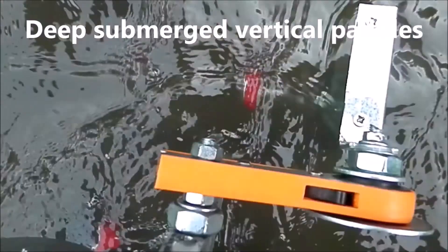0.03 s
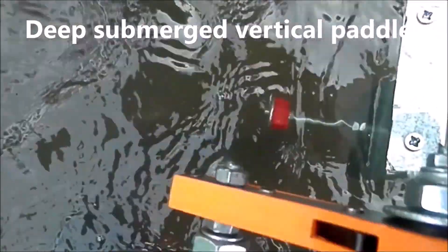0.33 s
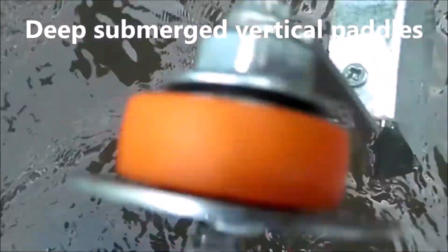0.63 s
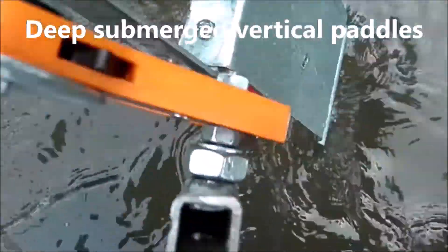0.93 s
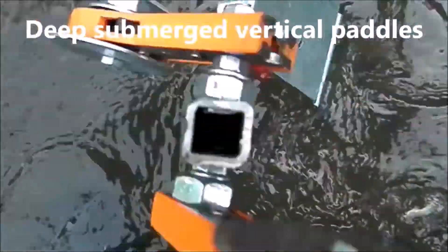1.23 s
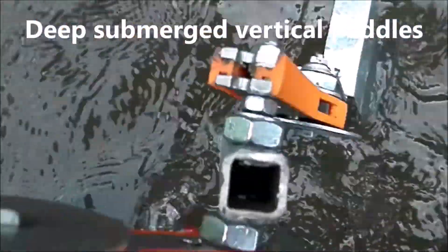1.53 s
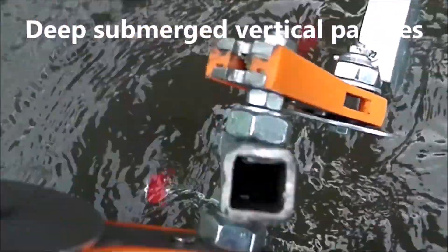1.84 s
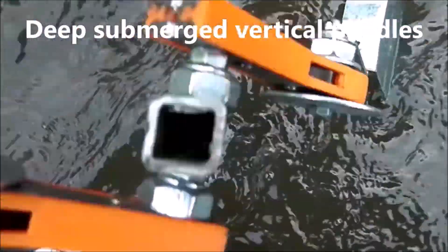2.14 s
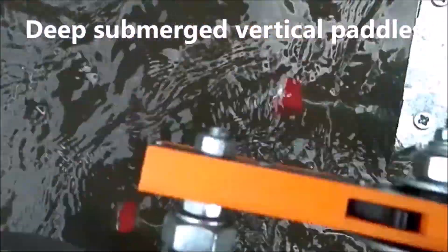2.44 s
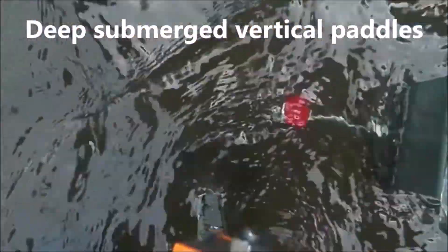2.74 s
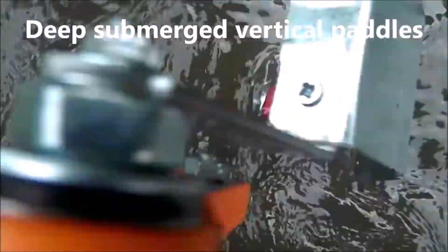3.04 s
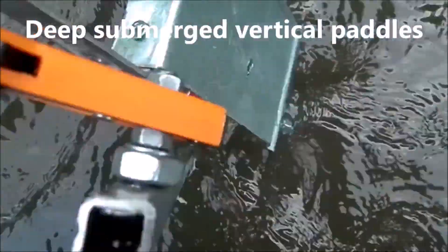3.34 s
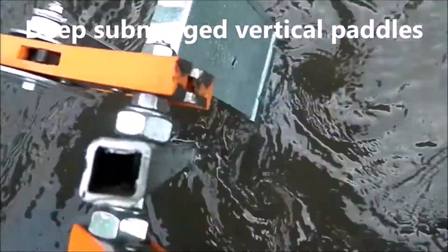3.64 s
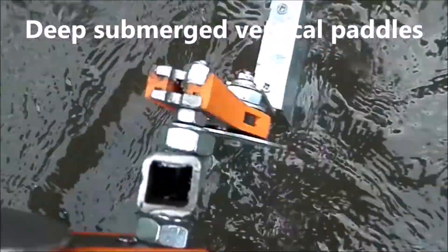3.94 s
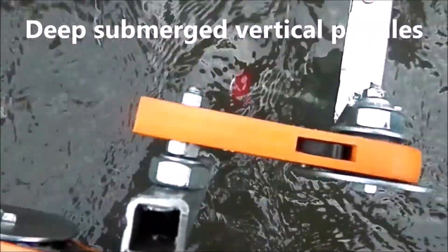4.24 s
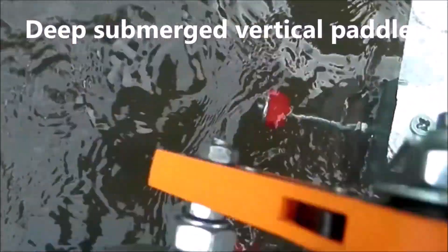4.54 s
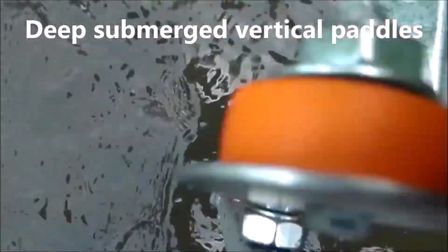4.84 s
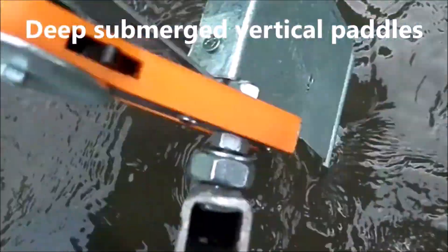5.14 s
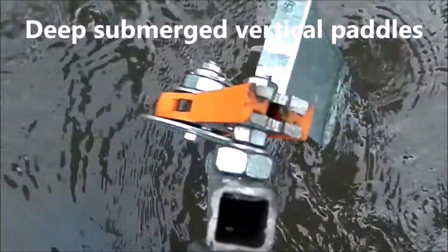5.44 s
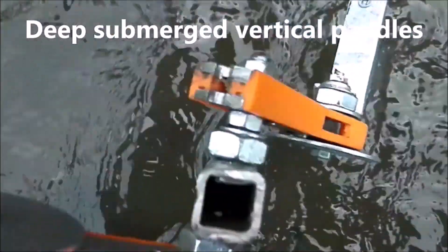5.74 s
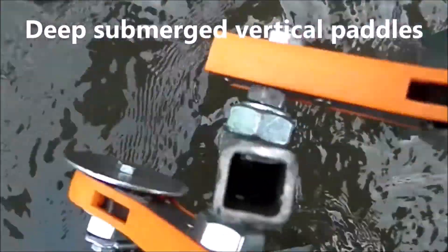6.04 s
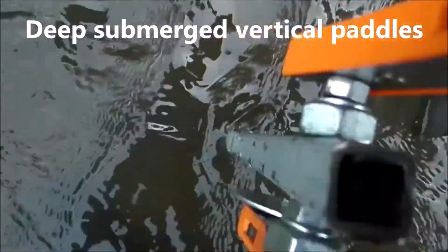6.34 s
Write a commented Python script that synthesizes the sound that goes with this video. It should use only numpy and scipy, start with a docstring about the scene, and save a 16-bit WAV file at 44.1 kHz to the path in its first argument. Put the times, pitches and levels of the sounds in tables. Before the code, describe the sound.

A steel paddle wheel turns close to the microphone on a river. Its loose joints clink, click and knock in a quick, uneven stream, briefly ringing the frame and blades, strongest in the first second. Underneath, the water rumbles faintly, trickles and plops. A deep eddy swells softly about two seconds in, and the loudest plops come near four seconds while the rattling carries on.

```python
"""A steel paddle wheel turns close by in a river that rumbles, trickles and plops throughout.
From the start its loose linkage knocks and clicks, ringing frame and blades; at 0.1 s a link scrapes.
At 1.6 s a blade dips, ringing flatter as it sinks. At 2.2 s a deep eddy swells.
The next blade dips at 4.0 s, followed by the loudest plops; a third dips at 5.6 s."""
import sys
import numpy as np
from scipy import signal
from scipy.io import wavfile
from scipy.ndimage import uniform_filter1d

SR = 44100
rng = np.random.default_rng(int(sys.argv[2]) if len(sys.argv) > 2 else 0)


def write(x):
    x = np.atleast_2d(x).T
    wavfile.write(sys.argv[1], SR, np.round(np.clip(x, -1, 1) * 32767).astype(np.int16))


N = 291060
TIME_S = np.arange(N) / SR
AGE_S = np.arange(3 * SR // 10) / SR  # time since an event's onset


def linkage(build_s=0.004, snap=0.37, snap_t60_s=0.022, touch_s=0.00043, small_count=72,
            small_scatter_db=11, clear_scatter_db=5, sag=0.145):
    """Each knock: a short crack, the ring of a few small parts, the clear modes of frame and blade."""
    # Knock registers clink, thud, body, clang, sparkle: (low [Hz], high [Hz], centre [Hz], width [Hz],
    # crack t60 [s], small parts [dB], their base t60 [s], clear modes [dB], trim [dB])
    registers = [(3064, 8500, 5170, 3700, 0.025, -3, 0.057, -9.5, 0.7),
                 (128, 1200, 190, 247, 0.031, -14.5, 0.4, -18.5, -1.5),
                 (1100, 2700, 2170, 830, .03, -3.5, 0.37, 0.5, 0.5),
                 (2755, 3050, 2860, 130, 0.055, -4.5, .15, 10, -1),
                 (8915, 13600, 11060, 2400, 0.028, -0.5, .052, -12, -0.5)]
    # Frame and link modes: (frequency [Hz], relative level [dB], t60 [s])
    frame_modes = [(656, 0, 0.38), (1366, -12.5, 0.56), (1742, -10, 0.73), (2265, -6.5, 0.4),
                   (2426, -5, 0.36), (2600, -3, 0.47), (3160, -1, 0.3), (3370, -2, 0.43),
                   (4140, -3.5, 0.22), (4300, 2, 0.056), (4340, 3, 0.12), (5030, 6, 0.21),
                   (5350, 5.5, 0.25), (6000, 0, 0.081), (6980, 2, 0.3), (7170, 8, 0.1), (7300, -5, .1),
                   (8640, -7, .3), (10250, 2.5, 0.1), (10940, 2.5, 0.19), (10800, -2.5, .1),
                   (11200, -3.5, .07), (13100, -4, .08)]
    # Blade modes in air: (frequency [Hz], relative level [dB], t60 [s])
    blade_modes = [(1254, -4, 0.23), (1913, -1, 0.29), (1945, 0.5, 0.28), (2034, -1, .26),
                   (2784, -15, 0.34), (2845, -4.5, 0.12), (2872.5, 3.5, 0.077), (2973, -13, 0.14),
                   (3510, 10.5, .07)]
    out = np.zeros(N)
    hits = impacts()
    contacts = [contact(chatter) for *_, chatter in hits]
    # Dragged water costs a sunken blade the share `sag` of its pitch.
    clocks_s = [np.cumsum(1 - sag * blade_depth(s + AGE_S)) / SR for s, *_ in hits]
    swell = 1 - np.exp(-AGE_S / build_s)  # the blow reaches the blade late, through the arm
    for r, register in enumerate(registers):
        low_hz, high_hz, centre_hz, width_hz = register[:4]
        crack_t60_s, small_db, small_t60_s, clear_db, trim_db = register[4:]
        frame = np.array([mode for mode in frame_modes if low_hz <= mode[0] < high_hz]).reshape(-1, 3)
        blade = np.array([mode for mode in blade_modes if low_hz <= mode[0] < high_hz]).reshape(-1, 3)
        frame_ring = modes(*frame.T, AGE_S)
        small_hz = low_hz + (high_hz - low_hz) * jittered(small_count)
        hump_db = -10 * np.log10(1 + (2 * (small_hz - centre_hz) / width_hz) ** 2)
        decays_s = small_t60_s * 2 ** rng.uniform(-2.1, 0.79, small_count)
        small_ring = modes(small_hz, hump_db, decays_s, AGE_S)
        grit = resonate(noise(low_hz, high_hz), centre_hz, width_hz)
        crack_decay = (fade(crack_t60_s) + snap * fade(snap_t60_s))[0]
        crack_power = (crack_decay * (1 - np.exp(-AGE_S / touch_s))) ** 2
        ring_rise = 1 - np.exp(-AGE_S * low_hz)  # a cycle or two
        for (s, clink_db, *colour_db, _), blows, clock_s in zip(hits, contacts, clocks_s):
            power, fed = np.zeros((2, len(AGE_S)))
            for lag_s, size in blows:  # each rebound cracks anew and feeds the ring
                add(power, lag_s, size ** 2 * crack_power)
                fed[int(lag_s * SR):] += size ** 2
            start = rng.integers(N - len(AGE_S))
            crack = np.sqrt(power) * grit[start:start + len(AGE_S)]
            small = strike(small_ring, small_scatter_db)
            clear = strike(frame_ring, clear_scatter_db)
            clear = clear + swell * strike(modes(*blade.T, clock_s), clear_scatter_db / 2)
            ring = at_level(small, small_db) + at_level(clear, clear_db)
            knock = at_level(crack, 0) + ring * np.sqrt(fed / fed[-1]) * ring_rise
            if r == 0:  # clink
                knock = soften(knock, sparkle_db=colour_db[-1])
            add(out, s, at_level(knock, clink_db + [0, *colour_db][r] + trim_db))
    return out


def impacts(base_thud_db=-15, thud_per_hardness=0.35, lurch_half_s=0.045,
            click_clang_db=-13, click_chatter=0.11):
    """All blows: (time [s], clink [dB], thud, body, clang, sparkle [dB re clink], chatter [1])."""
    # Knocks that ring a blade: (time [s], clink [dB], hardness = sparkle [dB re clink],
    # blade clang [dB re clink], chatter = rebound scale [1])
    knocks = [(.0748, -25.5, -18, 0.5, -0.5), (.1832, -27.5, -12.5, -2, -0.2),
              (.3223, -27, -8.5, 6.5, -0.5), (.4728, -29, -13.5, -1.5, 0.2), (.5867, -29, -3.5, -2.5, 0.6),
              (.7001, -30.5, -1.5, -0.5, 0.3), (.8001, -32, -2.5, -4.5, 0.8), (.9014, -34.5, -1.5, -3, .8),
              (1.009, -38.5, 6, 4.5, .5), (1.08, -47, 4, -2, 2), (1.151, -43.5, 10.5, 6, 0),
              (1.1712, -38.5, -33, -4, 2.5), (1.2402, -39.5, 3, -1, 0.5), (1.419, -40.5, 0.5, -4.5, 0.5),
              (1.444, -58.5, 7, 12.5, -4), (1.4784, -43, -3.5, -8, 0), (1.515, -47, -7, -2, 1.1),
              (1.6812, -44.5, -9.5, -7, 0), (2.257, -42.5, 8.5, -2, 0), (2.3183, -37, -4, -4, 4),
              (2.7406, -36, -4, 2, .5), (2.8733, -35.5, -1.5, -7.5, 0.3), (3.0442, -38.5, 7, 2, 0.3),
              (3.1137, -40, -7.5, 3, 0.8), (3.393, -44.5, 4.5, 7, 0.6), (3.5155, -40.5, -3, -6.5, 0),
              (3.5664, -38, 2.5, -1, 1), (3.6444, -40, 3.5, -2, 0), (3.8247, -45, -0.5, -0.5, 0.1),
              (3.8811, -42, -0.5, -9, -1), (3.9357, -43, .5, -12, -0.5), (3.9881, -40, 5, -6.5, .5),
              (4.0775, -39, -3.5, -4.5, 1.1), (4.24, -42.5, -3.5, -6, -0.7), (4.4325, -40.5, -1, 1, -3.5),
              (5.0797, -38, 0.5, -7, 1), (5.1532, -37, 1.5, -2.5, 1.8), (5.2117, -38.5, 7, -4, 1),
              (5.2553, -35.5, 4, 4.5, .6), (5.3033, -36, -24, 0, 1), (5.3117, -43.5, 11.5, -3, 0.8),
              (5.4766, -41.5, 0, -7, 0), (5.55, -44.5, 1.5, -7, .5), (5.5648, -48, 2, 2.5, -0.2),
              (5.6587, -41.5, -1, -2.5, -0.5), (5.8234, -37.5, 1.5, -9, 1), (5.903, -42.5, -5, -4, 0.7),
              (5.9388, -37.5, 0.5, -5, -1), (6.1291, -40.5, -3, -0.5, -0.3), (6.2693, -37.5, -3.5, -6.5, 0),
              (6.288, -49.5, -6, -0.5, .1), (6.5529, -39, -2.5, -7.5, 0.6)]
    # Dry clicks of a pin falling against its stop: (time [s], clink [dB], hardness [dB re clink])
    clicks = [(.2334, -38.5, -11), (.276, -53, -32), (0.3452, -36, -30), (0.4123, -36.5, -14),
              (0.526, -36, -17), (.625, -36.5, -17), (0.7672, -41, -17), (.861, -43.5, -9.5),
              (0.9688, -40.5, 0), (1.0487, -38, -2.5), (1.1062, -39, 0), (1.3121, -37.5, -1.5),
              (1.3528, -47.5, 2), (1.3675, -37, -7), (1.5633, -45, 1), (1.758, -60.5, -22),
              (2.035, -44.5, -8), (2.1419, -50, -3), (2.2486, -39, -5), (2.4405, -41, -4.5),
              (2.6409, -38.5, -3), (2.7299, -46, -10), (2.81, -43.5, -7.5), (2.9136, -49, -15),
              (2.974, -37, -4), (2.9894, -37, 2.5), (3.0228, -48, -2), (3.0792, -49, -12),
              (3.2025, -47.5, -10), (3.2158, -42, 0), (3.4312, -41.5, -3.5), (3.4925, -41.5, 1.5),
              (3.707, -40.5, -9), (3.7643, -38, -3), (3.778, -49, -1), (4.1621, -39, -1.5),
              (4.172, -49, -4), (4.281, -58, -12), (4.3178, -37, -1.5), (4.6055, -41.5, -13),
              (4.6233, -43, -12), (4.737, -47, -7), (4.8104, -38, 0.5), (4.83, -46, -4), (4.901, -37.5, 2),
              (4.9985, -36.5, 1), (5.2044, -37.5, -3), (5.367, -39, -0.5), (5.3814, -53, 12),
              (5.4236, -38.5, -7), (5.643, -46, -3), (5.7516, -39.5, -5.5), (5.8775, -38.5, -5),
              (6.0032, -52, -12), (6.0167, -38, 1.5), (6.1503, -50, -4), (6.3675, -56, -15),
              (6.39, -40.5, 0), (6.594, -47, -5)]
    # The load lurches and blows shake the whole frame: (time [s], extra thud [dB])
    lurches = [(.32, 4), (1.01, 9), (1.37, 7.5), (2.25, 12.5), (3.04, 7), (4.16, 6), (5.25, 7), (5.82, 9.5)]
    # Hollow body in the knocks as the wheel turns: (time [s], level [dB re clink])
    body = [(0, -14.5), (.5, -14), (.59, -10), (1.15, -14), (1.42, -18), (2.05, -9.5), (2.27, -10.5),
            (2.44, -21), (2.85, -17.5), (3.05, -13.5), (3.55, -14), (4.35, -18.5), (5.05, -11.5),
            (5.3, -12.5), (5.42, -18.5), (5.85, -14), (6.05, -22.5), (6.6, -14.5)]
    blows = list(knocks) + [(*click, click_clang_db, click_chatter) for click in clicks]
    rows = []
    for s, clink_db, hardness_db, clang_db, chatter in blows:
        lurch_db = sum(db * np.exp(-((s - at_s) / lurch_half_s) ** 2) for at_s, db in lurches)
        thud_db = base_thud_db + thud_per_hardness * hardness_db + lurch_db
        body_db = np.interp(s, *np.transpose(body))
        rows.append((s, clink_db, thud_db, body_db, clang_db, hardness_db, chatter))
    return rows


def contact(chatter, first_s=0.0029, span_s=0.0078, settle=0.13, count=3):
    """One blow, rebounds of the pin in its hole, a light settling touch: (lag [s], size [1])."""
    lags_s = first_s + span_s * jittered(count)
    rebounds = [(lag_s, 0.67 * chatter * rng.uniform(0.32, 1.1)) for lag_s in lags_s]
    last_touch = (rng.uniform(0.011, 0.035), settle * rng.uniform(0.19, 1.5))
    return [(0.0006, 1), *rebounds, last_touch]


def modes(hz, db, t60_s, clock_s):
    """A decaying cosine and sine per mode; a slower clock flattens them all."""
    angle = (2 * np.pi * np.outer(hz, clock_s)).astype(np.float32)
    envelope = (undb(db)[:, None] * fade(t60_s)).astype(np.float32)
    return np.r_[envelope * np.cos(angle), envelope * np.sin(angle)]


def strike(ring, scatter_db):
    """Each blow lands elsewhere: sum the modes with new sizes and phases."""
    count = len(ring) // 2
    size = undb(scatter_db * rng.standard_normal(count))
    phase = 2 * np.pi * rng.random(count)
    return np.r_[size * np.cos(phase), size * np.sin(phase)].astype(np.float32) @ ring


def soften(x, sparkle_db, corner_hz=8500, db_per_octave=20):
    """A softer contact rounds off the top of the clink."""
    cutoff_hz = np.clip(corner_hz * 2 ** (sparkle_db / db_per_octave), 3000, 16000)
    return signal.lfilter(*signal.butter(2, cutoff_hz, fs=SR), x)


def blade_depth(s, steepness=2.58):
    """Immersion at time s; each dip is one smooth plunge and rise."""
    # Blade dips: (time at deepest [s], depth [0-1], half length [s])
    dips = [(1.575, 0.82, 0.16), (3.994, 1, .18), (5.631, 0.98, .19)]
    return sum(depth * np.exp(-np.abs((s - at_s) / half_s) ** steepness) for at_s, depth, half_s in dips)


def grazes(relative_db=-15, lead_s=0.0037, t60_s=0.046):
    """Just before each knock the pin brushes the side of its hole."""
    envelope = np.zeros(N)
    for s, clink_db, *_ in impacts():
        add(envelope, s - lead_s * rng.uniform(0.54, 0.72), undb(clink_db + relative_db) * fade(t60_s)[0])
    brush = resonate(noise(2200, 13000), hz=3700, width_hz=5000)
    return envelope * brush / rms(brush)


def slack_pin(hz=10925, relative_db=-1, t60_s=0.12, ahead_s=0.19):
    """While a blade descends, one pin hangs slack and pings at every knock."""
    out = np.zeros(N)
    for s, clink_db, *_ in impacts():
        descent = blade_depth(s + ahead_s) - blade_depth(s - ahead_s)
        slack = np.sqrt(np.clip(descent, 0, 1))
        tone = np.sin(2 * np.pi * hz * (1 + 0.0024 * rng.standard_normal()) * AGE_S)
        add(out, s, slack * undb(clink_db + relative_db) * tone * fade(t60_s)[0])
    return out


def scrape(start_s=0.111, length_s=0.027, db=-35, slips_per_s=900):
    """A link slides along its washer: dense slips excite the steel's resonances."""
    n = int(length_s * SR)
    arch = np.sin(np.pi * np.sqrt(np.arange(n) / n)) ** 2
    slips = np.zeros(len(AGE_S))
    slips[:n] = (rng.random(n) < slips_per_s / SR) * rng.uniform(0.54, 1, n) * arch
    steel = [(1950, 120), (3080, 200), (3650, 280), (4350, 220)]
    rub = sum(resonate(slips, hz, width_hz) for hz, width_hz in steel)
    out = np.zeros(N)
    add(out, start_s, undb(db) * rub / rms(rub[:n]))
    return out


def washers(offset_db=-12, spread_db=5, t60_s=0.026, count=2):
    """Loose washers tick faintly, shaken by each knock."""
    envelope = np.zeros(N)
    for s, clink_db, *_ in impacts():
        for when, size in rng.random((count, 2)):
            tick_db = min(clink_db, -38) + offset_db + spread_db * (2 * size - 2.5)
            add(envelope, s + 0.012 + 0.055 * when, undb(tick_db) * fade(t60_s)[0])
    rattle = resonate(noise(2200, 12000), hz=4200, width_hz=2800)
    return envelope * rattle / rms(rattle)


def plops(slap_db=-10, slap_t60_s=0.027):
    """Big air pockets close behind the blades, each with a wet slap."""
    # Air pockets: (time [s], pitch [Hz], level [dB], t60 [s])
    pockets = [(.61, 692, -48, 0.19), (.81, 585, -48, 0.29), (1.14, 437, -45.5, 0.12),
               (1.273, 1060, -48, .06), (1.639, 476, -34, 0.048), (1.965, 760, -49.5, 0.15),
               (2.647, 276, -45, 0.14), (3.115, 577, -51, 0.47), (3.931, 1100, -47, 0.047),
               (3.999, 1224, -48.5, 0.15), (4.06, 472, -29, 0.17), (4.123, 387, -27.5, 0.075),
               (4.776, 788, -37.5, 0.056), (5.735, 810, -47, .06), (5.775, 764, -46.5, 0.12)]
    out = np.zeros(N)
    for s, hz, db, t60_s in pockets:
        splash = resonate(noise(250, 3500, n=len(AGE_S)), 0.81 * hz, width_hz=2 * hz)
        slap = undb(slap_db) * fade(slap_t60_s)[0] * splash / rms(splash)
        add(out, s, undb(db) * (bubble(hz, t60_s, glide_per_s=0.12) + slap))
    return out


def trickle(max_db=-71, range_db=10, t60_cycles=26, count=90):
    """Small bubbles ring at random times, the higher ones fainter."""
    out = np.zeros(N)
    for when, size, pitch in rng.random((count, 3)):
        hz = 330 * 4.5 ** pitch
        db = max_db - range_db * (1 - size) - 4 * pitch
        add(out, when * N / SR, undb(db) * bubble(hz, t60_cycles / hz, glide_per_s=1.6))
    return out


def bubble(hz, t60_s, glide_per_s):
    """A pocket of air rings, its pitch drifting up as it rises."""
    tone = np.sin(2 * np.pi * hz * AGE_S * (1 + glide_per_s * AGE_S))
    return tone * fade(t60_s)[0] * (1 - np.exp(-AGE_S * hz))


def eddy(peak_s=2.22, half_s=0.19, db=-50):
    """One deep eddy swells under the wheel."""
    churn = resonate(noise(30, 220), hz=53, width_hz=120)
    return undb(db) * np.exp(-((TIME_S - peak_s) / half_s) ** 2) * churn / rms(churn)


def river(rumble_trim_db=2.5, wash_trim_db=0.04, flicker_db=2.53):
    """Churning water in half-octave bands, each flickering alone: deep rumble, lighter wash."""
    # Stirred river, before trim: (time [s], rumble [dB], wash at 300-1000 Hz [dB])
    levels = [(0.25, -55, -58.5), (0.94, -55.5, -60.5), (1.59, -57.5, -61.5), (2.05, -51, -60),
              (2.2, -50.5, -55), (2.42, -61, -64.5), (2.69, -56.5, -67.5), (2.96, -55, -59),
              (3.47, -59, -68.5), (4.09, -56.5, -59.5), (4.41, -57.5, -67.5), (4.64, -50.5, -58.5),
              (4.95, -60, -62.5), (5.24, -54, -60), (5.5, -58, -65), (5.89, -56.5, -59.5),
              (6.19, -60, -67.5), (6.6, -59.5, -68)]
    # Water spectrum: (frequency [Hz], relative density [dB])
    spectrum = [(20, -13.5), (38, 4), (55, -7.5), (80, -6), (130, -6.5), (250, -17), (480, -10.5),
                (800, -22), (1300, -28), (3000, -39.5), (8000, -41), (13000, -43)]
    times_s, *columns_db = np.transpose(levels)
    rumble_db, wash_db = (np.interp(TIME_S, times_s, column) for column in columns_db)
    points_hz, points_db = np.transpose(spectrum)
    rumble, wash = np.zeros((2, N))
    for k in range(19):
        hz = 27 * 2 ** (k / 2)
        db = np.interp(np.log(hz), np.log(points_hz), points_db) + flicker_db * walk(rate_hz=14)
        add(rumble if hz < 250 else wash, 0, undb(db) * noise(hz / 2 ** 0.25, hz * 2 ** 0.25, order=2))
    rumble *= undb(rumble_db + rumble_trim_db) / rms(rumble)
    wash *= undb(wash_db + wash_trim_db) / rms(band(wash, 300, 1000))
    return rumble + wash


def undb(db):
    """Decibels to gain."""
    return 10 ** (np.asarray(db) / 20)


def rms(x):
    """Root mean square."""
    return np.sqrt(np.mean(x ** 2)) + 1e-12


def at_level(x, db):
    """Scale x so its first 15 ms have this RMS level."""
    return x * undb(db) / rms(x[:int(0.015 * SR)])


def fade(t60_s):
    """Free decay, one row per decay time."""
    return np.exp(-np.log(1000) * AGE_S / np.reshape(t60_s, (-1, 1)))


def band(x, low_hz, high_hz, order=3):
    """Causal band-pass."""
    return signal.sosfilt(signal.butter(order, [low_hz, high_hz], "band", fs=SR, output="sos"), x)


def noise(low_hz, high_hz, order=3, n=N):
    """Band-passed white noise."""
    return band(rng.standard_normal(n), low_hz, high_hz, order)


def resonate(x, hz, width_hz):
    """One resonance, gain 1 at its centre."""
    return signal.lfilter(*signal.iirpeak(hz, max(hz / width_hz, 0.3), fs=SR), x)


def jittered(count):
    """One random point in each of count equal parts of 0-1."""
    return (np.arange(count) + rng.random(count)) / count


def walk(rate_hz):
    """Random steps, smoothed twice; spread near 1."""
    hold = int(SR / rate_hz)
    steps = np.repeat(rng.standard_normal(N // hold + 1), hold)
    return 1.5 * uniform_filter1d(uniform_filter1d(steps, hold), hold)[:N]


def add(out, s, x):
    """Mix x into out from time s."""
    i = max(int(s * SR), 0)
    out[i:i + len(x)] += x[:max(len(out) - i, 0)]


def scene():
    """The wheel close by, the water just below; mono."""
    wheel = linkage() + grazes() + slack_pin() + scrape() + washers()
    water = plops() + trickle() + eddy() + river()
    return (wheel + water)[None]


def record(dry, start_s=0.069, rise_s=0.002, top_hz=13500):
    """Brief silence, a fast fade-in, a steep low-pass."""
    gate = np.clip((TIME_S - start_s) / rise_s, 0, 1)
    return signal.sosfilt(signal.ellip(10, 0.2, 60, top_hz, fs=SR, output="sos"), dry * gate)


dry = scene()
out = record(dry)
write(out)
```